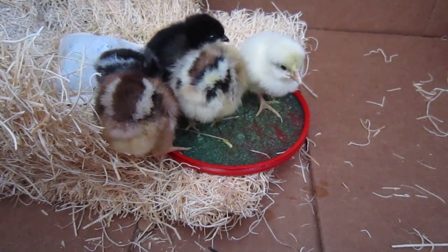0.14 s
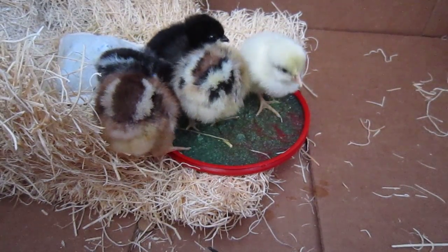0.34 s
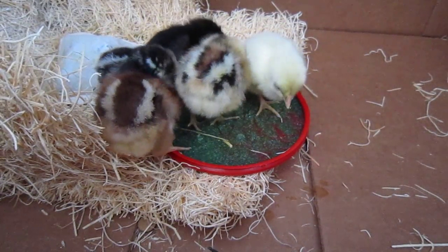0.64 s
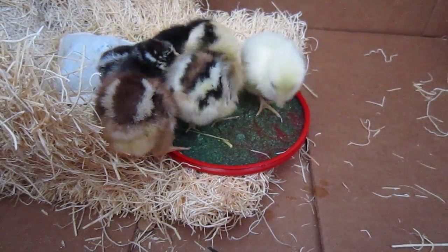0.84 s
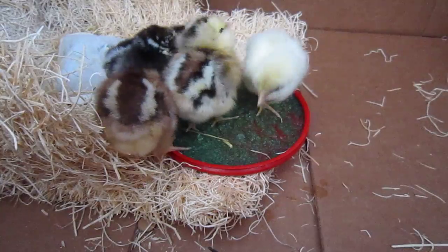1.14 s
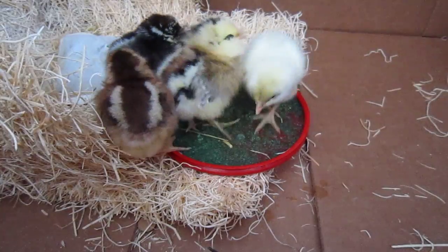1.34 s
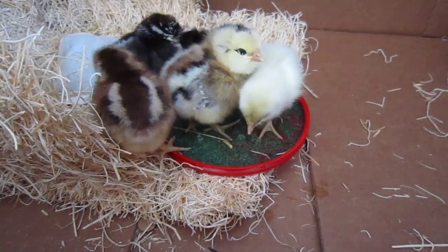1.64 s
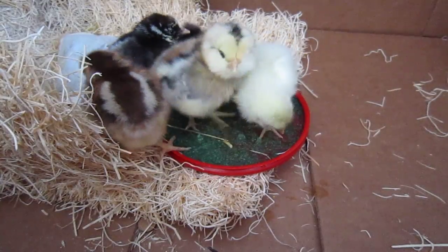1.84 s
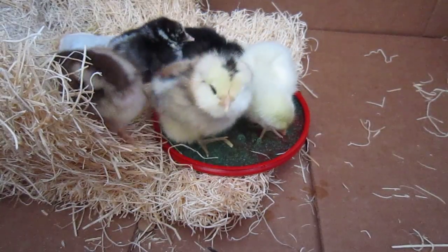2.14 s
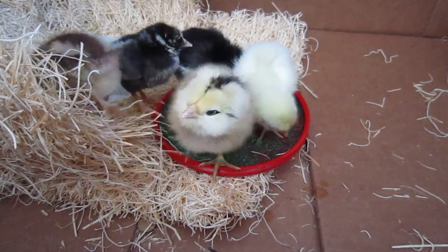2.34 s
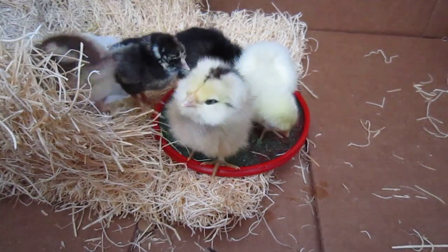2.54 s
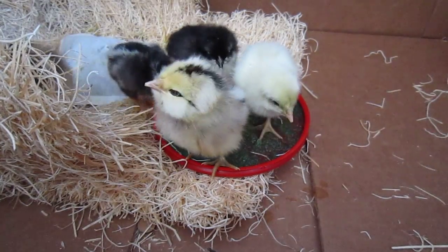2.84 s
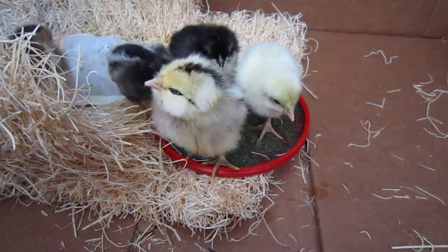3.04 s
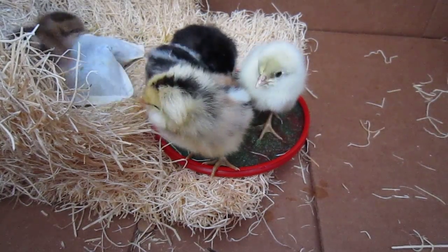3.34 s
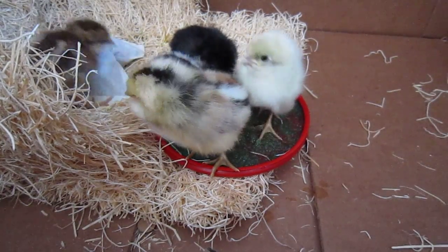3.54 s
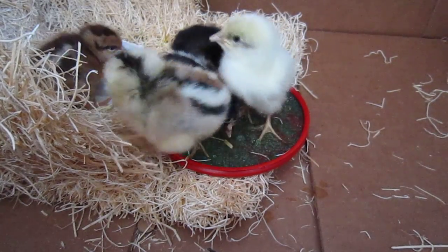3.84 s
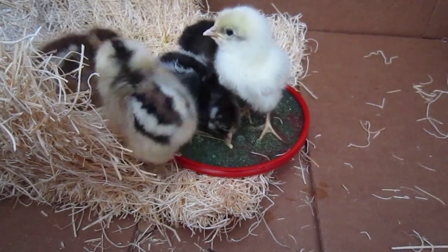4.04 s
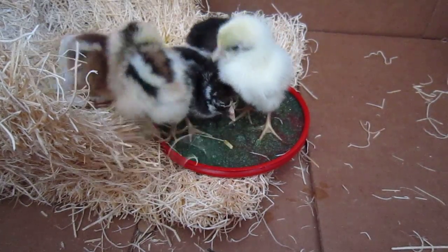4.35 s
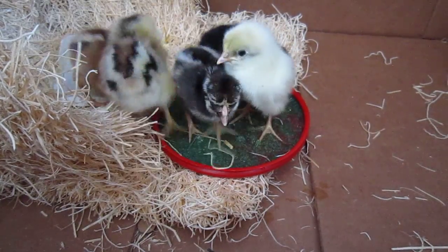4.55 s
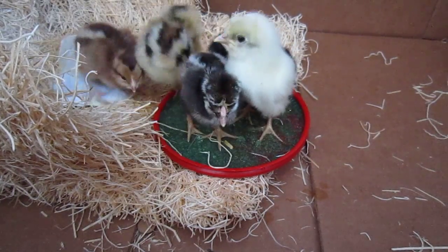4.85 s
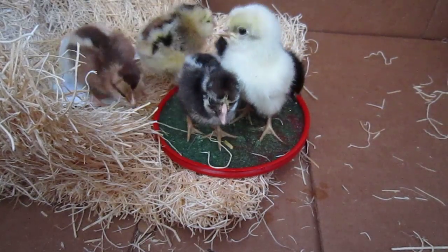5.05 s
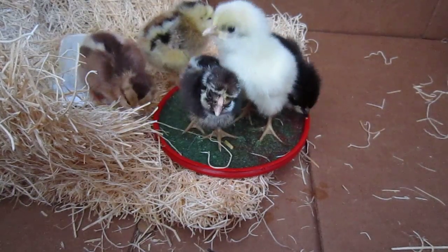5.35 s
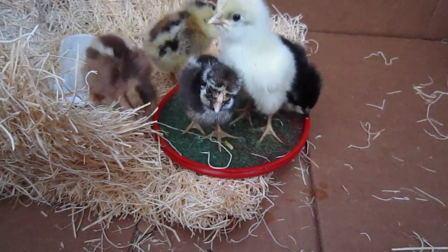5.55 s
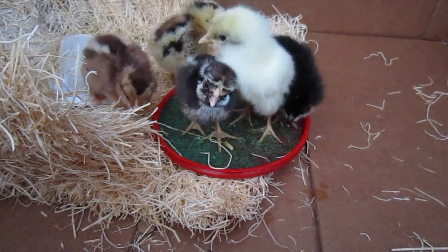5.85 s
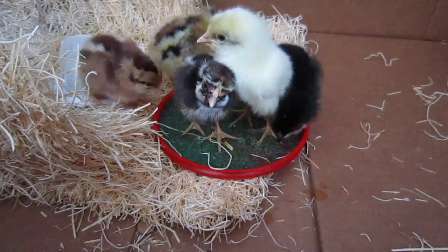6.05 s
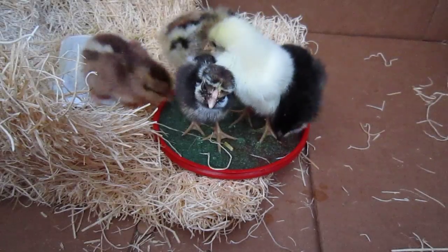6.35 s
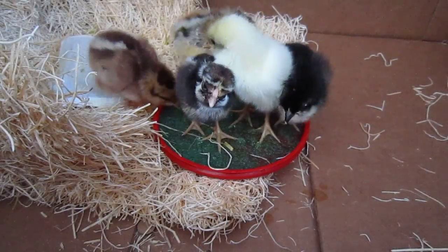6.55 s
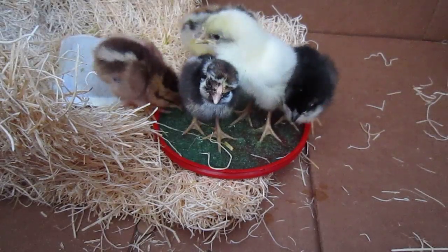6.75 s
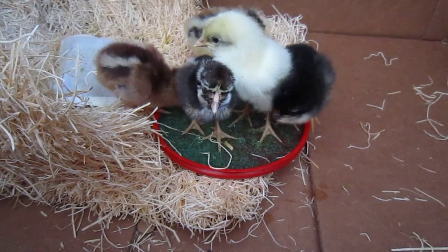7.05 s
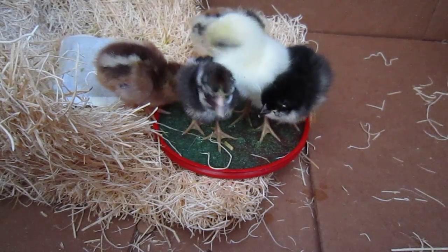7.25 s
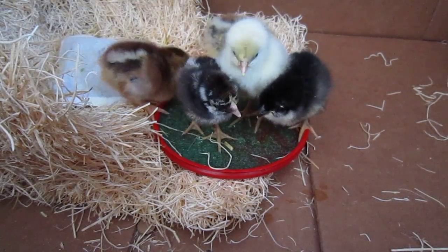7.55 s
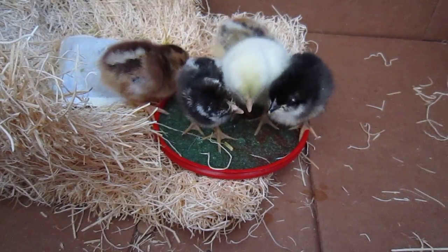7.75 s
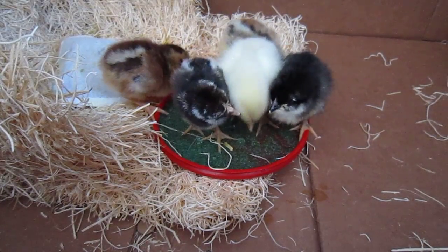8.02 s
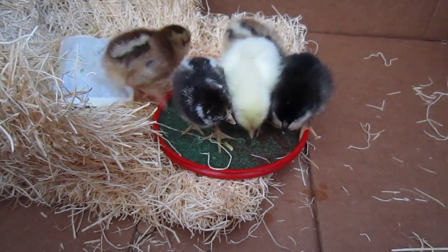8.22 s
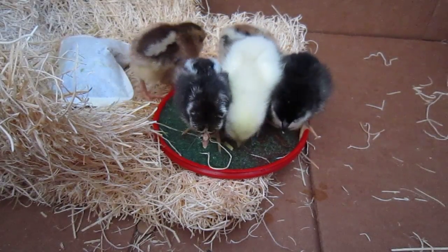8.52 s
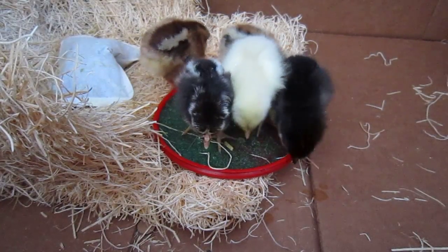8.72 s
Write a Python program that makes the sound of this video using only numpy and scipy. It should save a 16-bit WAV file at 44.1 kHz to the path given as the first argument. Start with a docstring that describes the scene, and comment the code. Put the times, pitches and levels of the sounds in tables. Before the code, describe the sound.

Young chicks peep close by in a cardboard box, with a short, small-room echo. Each peep is a brief, high whistle, most sliding down, some flicking up, occasionally two overlapping. Soft peeps begin at about 0.7 seconds, with a few tiny ticks of pecks and steps. Louder peeps come about three a second from 1.5 to 3 seconds. From 3 to 5 seconds small feet crackle through dry wood shavings and tap lightly on a feed dish, with scattered chirps among them. The peeping is loudest and busiest from about 4.6 to 6.8 seconds, while the rustling dies back to occasional ticks. More widely spaced chirps and a few pecks continue until nearly 9 seconds. Soft room air and a faint, steady appliance hum run throughout, joined by a faint low drone from about 6 to 7.5 seconds.

```python
"""Day-old chicks peep, close by, in a cardboard box lined with wood wool.
Each peep is a gliding whistle with weak overtones; feet snap shavings and tap the feed dish.
Box walls and room add short tails, over air noise, a steady appliance hum and a brief low drone."""
import sys
import numpy as np
from scipy import signal
from scipy.fft import rfft, irfft
from scipy.io import wavfile
from scipy.ndimage import uniform_filter1d

SR = 44100
rng = np.random.default_rng(int(sys.argv[2]) if len(sys.argv) > 2 else 0)


def generate_wav(sig):
    """Save sig (samples, or channels by samples) to the path in sys.argv[1] as 16-bit PCM at SR."""
    pcm = np.round(np.clip(np.atleast_2d(sig).T, -1, 1) * 32767).astype(np.int16)
    wavfile.write(sys.argv[1], SR, pcm)


N = 391608

THIN, THICK = (13500, 5000), (7500, 8500)  # fine and coarse fibre snaps: centre_hz, width_hz


def peeps():
    """Syrinx whistles, sometimes two at once: gliding sines plus overtones, coloured by the box."""
    # falling peeps: start_s, hold_s, fall_s, top_hz, end_hz, level_db, swell_db, fade_db, second_db
    falls = [ (0.655, 0.0053, 0.03, 3830, 2880, -41.5, 7, -10, -18),
             (.775, 0.0022, 0.047, 4290, 3110, -46, 14, -9.5, -22),
             (1.151, 0.018, 0.057, 4300, 2910, -38.5, 3.5, -9.5, -19.5),
             (1.211, 0.0036, 0.053, 4710, 3280, -42, 4, -9.5, -23),
             (1.564, 0.037, 0.057, 4840, 2876, -29.5, 12, -1.5, -20.5),
             (1.578, 0.038, .02, 5080, 4200, -45, 2, 12, -25),
             (1.717, 0, 0.041, 3420, 2990, -45.5, -3, 5, -21),
             (1.822, 0.055, 0.048, 4994, 2740, -26, 8.5, -1, -18),
             (2.137, 0, 0.045, 4150, 3100, -42, 10, -17, -26),
             (2.151, 0.067, 0.052, 5140, 2730, -26.5, 14, -2, -21.5),
             (2.467, 0.069, 0.065, 5183, 2800, -29.5, 19, 0, -14),
             (2.725, 0.0097, 0.047, 3670, 2790, -34, 22, 9, -16.5),
             (2.78, 0.073, 0.045, 4984, 2556, -19.5, 16, 1.5, -23.5),
             (3.177, 0.00063, 0.065, 4430, 3030, -40, 11, 3, -20),
             (3.754, 0.0021, 0.024, 4260, 4070, -41, 19, 1, -36),
             (3.761, 0, .015, 3390, 3210, -40, 1, 11, -28),
             (3.859, 0.00084, 0.038, 4950, 3480, -34.5, 2, 4.5, -20),
             (3.864, 0.0091, 0.022, 5570, 4500, -42, 6, 0, -23),
             (3.988, 0.004, 0.048, 5180, 3530, -29.5, 4, 11.5, -25),
             (3.99, 0.0078, 0.041, 6160, 4900, -44, 8, -4, -13),
             (4.469, 0.008, 0.045, 4830, 3180, -36.5, -9.5, -12, -26),
             (4.583, 0.0069, 0.046, 5400, 4080, -27.5, 11, 17, -21),
             (4.59, .015, 0.03, 6270, 5300, -45, 8, 1, -25),
             (4.708, 0.01, 0.019, 2825, 2670, -45.5, -2, 18, -25),
             (4.727, 0.015, 0.058, 5640, 4220, -19.5, 18, 26, -25),
             (4.753, 0, 0.033, 6640, 5440, -39, -9, -6, -21),
             (4.795, 0.018, 0.026, 2930, 2600, -27.5, 17, 8, -29),
             (4.83, 0.0049, 0.032, 4120, 3050, -52, -2, -15.5, -19),
             (5.056, 0.039, 0.056, 4824, 3100, -23.5, 15.5, 4, -20),
             (5.181, 0.0078, 0.025, 5270, 4400, -44, 11, -2, -38),
             (5.181, 0.0093, 0.022, 4600, 3530, -35, 4, 5, -28),
             (5.231, 0.0065, 0.053, 4360, 3030, -46.5, 0, -7, -22),
             (5.301, 0.0063, 0.016, 6400, 5430, -39, 5, -1, -11),
             (5.302, 0.0081, 0.053, 5300, 3750, -28.5, 9, 7, -26),
             (5.309, 0.049, 0.052, 5110, 2710, -24, 21, -3.5, -19.5),
             (5.471, 0.017, 0.047, 5350, 3670, -24, 9.5, 9, -29),
             (5.465, 0.0073, 0.042, 6540, 4880, -32, 8, -2, -27),
             (5.495, 0.0031, 0.023, 6300, 4320, -36, 12, -17, -33),
             (5.644, 0.054, 0.062, 5170, 2786, -22, 27, 2, -21.5),
             (5.86, 0.01, 0.041, 5410, 3850, -34, 0.5, 7, -23),
             (5.879, 0, 0.025, 5800, 4700, -45.5, -3, 0, -26),
             (6.001, 0.012, 0.064, 5490, 3850, -29, 8.5, 16, -20),
             (6.013, 0.0048, 0.057, 5940, 5000, -43, 7, -7, -36),
             (6.012, 0.0088, .022, 6600, 5960, -49, 2, -2, -20),
             (6.044, .052, 0.05, 4900, 2727, -21.5, 17.5, 0.5, -20.5),
             (6.163, 0.053, 0.029, 5400, 3940, -27.5, 9, 19, -18),
             (6.17, 0.016, 0.032, 6550, 5450, -36, 3, 8, -34),
             (6.173, 0.006, .045, 7250, 5700, -47, 7, -1, -34),
             (6.354, 0.082, 0.048, 4915, 2756, -25, 15, -3, -20.5),
             (6.561, 0.027, 0.019, 3620, 2910, -34.5, 16, -5, -18),
             (6.709, 0.016, 0.05, 4395, 2960, -24.5, 20, 20, -21.5),
             (7.248, 0.024, 0.034, 3825, 2960, -35, 5.5, -5, -18),
             (7.252, 0, 0.06, 6330, 4900, -43, 7, -4, -29),
             (7.253, 0.028, 0.045, 5370, 4020, -32, 6, 21, -18),
             (7.603, 0, 0.022, 3880, 3300, -40.5, -3, -2, -31),
             (7.849, 0.035, 0.031, 3940, 2840, -35, 2.5, 4.5, -22),
             (7.87, 0.017, 0.035, 5550, 4250, -37.5, 1.5, 5, -23),
             (8.029, 0.0061, .014, 6500, 6200, -45, 2, 2, -34),
             (8.041, 0.019, 0.039, 5880, 4620, -27, 9, 14.5, -18.5),
             (8.673, 0.055, 0.03, 4380, 2870, -31, 0, 10, -18)]
    # rising peeps: start_s, hold_s, rise_s, hook_s, from_hz, top_hz, hook_hz,
    # level_db, swell_db, fade_db, second_db
    rises = [ (.902, 0.0082, 0.012, 0.013, 3150, 5200, 5220, -38, 9, 14, -26),
             (1.081, 0.017, 0.012, 0.013, 3460, 5700, 5070, -36, 9.5, 8, -20.5),
             (1.521, 0.0048, 0.023, .007, 3130, 4900, 4890, -37.5, -0.5, 16, -30),
             (1.54, 0, 0.0078, .007, 4700, 5640, 5770, -36.5, 1, 8, -20),
             (1.968, 0.0083, 0.035, 0.0092, 2590, 3704, 3510, -25.5, 6.5, 14, -28),
             (2.233, 0.0014, 0.01, .001, 3080, 3500, 3550, -34, 4, 4, -36),
             (2.677, 0.01, 0.02, 0.018, 2660, 3480, 3630, -37, 6, 17, -24),
             (2.981, 0.014, 0.022, 0.033, 2810, 3780, 3750, -36.5, -2, 19, -24),
             (3.125, 0.0061, 0.011, 0.028, 2910, 5030, 5000, -36.5, 7.5, 18, -19),
             (3.593, 0, 0.036, 0.0062, 2510, 3820, 3750, -24, 14, 14, -28),
             (4.114, 0.00073, 0.019, 0.017, 2390, 3730, 2540, -24, 30, 13.5, -22),
             (5.716, 0.0032, .02, 0.0044, 2420, 3690, 3580, -26.5, 16, -7, -16),
             (6.59, 0.0031, 0.026, 0.0077, 2574, 3770, 3170, -24, 16, 23, -32),
             (6.81, 0, 0.036, 0.0051, 2760, 4280, 3930, -23.5, 0, 13, -32.5),
             (7.318, 0.0072, 0.023, 0.019, 2760, 4210, 4170, -25, -0.5, 15, -23.5),
             (7.534, 0.0034, 0.036, 0.011, 2855, 4220, 4350, -24, 5.5, 26, -31),
             (8.417, 0.00039, 0.017, 0.0058, 2580, 2750, 2800, -36, 10, 3, -32)]
    # box response: pitch_hz, gain_db
    box_colour = [(2400, -7), (2780, -7.5), (2930, -5.5), (3200, -3.5), (3470, -1), (3800, -1), (3980, 1.5),
                  (4250, -5), (4620, -3), (4800, -4.5), (5100, -6), (5500, -8), (6500, -9)]
    edge_s, fall_peak_share, rise_peak_share = 0.0022, 0.33, 0.56
    waver, jitter_rad = 1 + .0035 * walk(290), 1.15 * walk(56)
    patchy_db, quaver = 3 * walk(168), walk(147)
    notes = [(start_s, hold_s, fall_s, 0, top_hz, end_hz, end_hz, fall_peak_share, *rest)
             for start_s, hold_s, fall_s, top_hz, end_hz, *rest in falls]
    notes += [(*row[:7], rise_peak_share, *row[7:]) for row in rises]
    out = np.zeros(N)
    for start_s, hold_s, glide_s, hook_s, from_hz, to_hz, hook_hz, peak_share, *levels in notes:
        level_db, swell_db, fade_db, second_db = levels
        stop_s = start_s + hold_s + glide_s + hook_s
        span = slice(int((start_s - edge_s) * SR), int((stop_s + edge_s) * SR))
        t = np.arange(span.start, span.stop) / SR
        age_s = t - start_s
        pitch_hz, progress = glide(start_s, age_s, hold_s, glide_s, hook_s, from_hz, to_hz, hook_hz)
        dip_surge_db, skip_hz = dips_surges_and_skips(start_s, age_s, progress)
        if to_hz < from_hz:
            pitch_hz += skip_hz
        pitch_hz = uniform_filter1d(pitch_hz, int(0.0053 * SR))
        first_db = dip_surge_db + np.interp(pitch_hz, *np.transpose(box_colour))
        first_db += quaver[span] * np.clip(.14 * (-22 - level_db), 0, 4)  # soft peeps quaver more
        tremble_hz, swing_hz = tremble(t, start_s, stop_s, jitter_rad[span])
        first_db += 0.0147 * tremble_hz
        pitch_hz = pitch_hz * waver[span] + tremble_hz
        phase = 2 * np.pi * (np.cumsum(pitch_hz) / SR + rng.random())
        shape_db = swell_and_fade(age_s, hold_s + peak_share * glide_s, swell_db, fade_db)
        second_db += 0.044 * (shape_db.max() - shape_db)  # overtones swell less
        second_db += patchy_db[span] + 0.031 * swing_hz  # wide tremble sounds harsher
        tone = undb(first_db) * np.sin(phase) + overtones(start_s, pitch_hz, phase, second_db)
        out[span] += gate(t, t[0], t[-1], 2 * edge_s) * undb(level_db + shape_db) * tone
    return out


def glide(start_s, age_s, hold_s, glide_s, hook_s, from_hz, to_hz, hook_hz):
    """Peep pitch: hold, rounded knee, glide, end hook. Also returns glide progress, 0 to 1."""
    # peeps that ease into their top pitch: start_s, below_top_hz
    arches = [(2.151, 320), (5.309, 200), (5.642, 320), (6.161, -330)]
    sag_hz_per_s, low_voice_hz = 780, 4500
    gentle = to_hz < from_hz < low_voice_hz
    knee_s = min(hold_s, .3 * glide_s) if gentle else min(0.7 * hold_s, 0.128 * glide_s)
    turn = np.logaddexp(0, (age_s - hold_s) / (knee_s + 0.00034))
    turn -= turn[0]
    progress = np.clip(turn / np.interp(hold_s + glide_s, age_s, turn), 0, 1)
    hook = np.clip((age_s - hold_s - glide_s) / max(hook_s, 1e-4), 0, 1)
    pitch_hz = from_hz + (to_hz - from_hz) * progress + (hook_hz - to_hz) * hook
    if to_hz < from_hz:  # held top: slide in, then sag
        sung_s = np.maximum(age_s, 0)
        scoop_hz = 0.0522 * min(hold_s / 0.011, 1) * from_hz * np.exp(-sung_s / 0.0021)
        arch_hz = sum(hz for at_s, hz in arches if abs(at_s - start_s) < .004) * np.exp(-sung_s / .02)
        sag_hz = sag_hz_per_s * (age_s - hold_s / 2) * (hold_s > 0)
        pitch_hz -= (1 - progress) * (sag_hz + scoop_hz + arch_hz)
    return pitch_hz, progress


def swell_and_fade(age_s, peak_s, swell_db, fade_db):
    """Peep envelope in dB below its peak."""
    before = np.clip(1 - age_s / peak_s, 0, 1) ** 0.84
    after = np.clip((age_s - peak_s) / (age_s[-1] - peak_s), 0, 1)
    return -swell_db * before - fade_db * after


def dips_surges_and_skips(start_s, age_s, progress):
    """Brief dips where a wall echo cancels the whistle, level surges, and small pitch skips."""
    # dips (negative: surges) and downward skips (negative: lags): at_s, dip_db, half_length_s, skip_hz
    events = [(0.808, 24, 0.0042, 0), (1.207, 15, 0.0044, -6), (1.642, 12, 0.0069, 0),
              (1.889, 12, 0.0033, 442), (2.236, 5, 0.0061, 200), (2.554, -7, 0.0024, 245),
              (2.867, 17, 0.0035, 133), (3.618, 23, 0.0079, 0), (3.872, 8, .003, 0), (4.478, 37, 0.0069, 0),
              (4.76, 20, 0.007, -2), (5.086, 9, 0.0057, -5), (5.135, 10, 0.003, 2), (5.376, -3, 0.0023, 0),
              (5.375, -3, 0.0027, 298), (5.501, 15, 0.0053, 0), (5.72, 3, 0.0025, 443),
              (5.736, 18, 0.0034, 3), (6.096, 10, 0.0026, 402), (6.12, 9, 0.0039, -5),
              (6.394, 21, 0.023, -22), (6.429, 17, 0.0084, -7), (6.449, -8, 0.0029, 350),
              (6.459, 15, 0.0022, 4), (6.595, 9, 0.0013, 6), (6.835, 11, .0025, 0), (8.722, 41, .006, -2),
              (8.701, -7, 0.0064, 6), (5.092, 0, .003, -250), (7.565, 10, .01, 0), (1.867, -6, 0.013, 11),
              (1.891, -5.5, 0.0055, 0), (2.24, -2, 0.0038, -10), (2.513, -19, 0.066, -12),
              (2.812, -9, 0.036, -5), (2.867, -8, 0.0045, -15), (5.101, -5, 0.0062, -4),
              (5.393, -8.5, 0.0041, 4), (5.744, -9.5, 0.0033, 9), (6.127, -6.5, 0.0077, -3),
              (6.466, -8, 0.0049, 0), (6.594, -12, 0.0061, 2), (8.744, -8, 0.015, 2),
              (1.186, -5.5, 0.018, 2), (1.656, -5.5, 0.0028, 2), (1.099, -4, 0.003, 0)]
    gain_db, offset_hz = np.zeros((2, len(age_s)))
    for at_s, dip_db, half_length_s, skip_hz in events:
        event_s = at_s - start_s
        if 0 < event_s < age_s[-1]:
            gain_db -= dip_db * np.clip(1 - np.abs(age_s - event_s) / half_length_s, 0, 1)
            done = np.interp(event_s, age_s, progress)
            sawtooth = np.where(age_s < event_s, progress / done, (progress - 1) / (1.001 - done))
            offset_hz += skip_hz / 2 * sawtooth
    return gain_db, offset_hz


def tremble(t, start_s, stop_s, jitter_rad):
    """The membrane trembles in places: fast pitch offset and its depth."""
    # trembling stretches: from_s, to_s, rate_hz, swing_hz
    flutter = [(0.904, 0.938, 320, 250), (1.086, 1.118, 320.4, 250), (1.577, 1.615, 265, 120),
               (2.158, 2.25, 216, 130), (5.305, 5.369, 222, 207), (5.645, 5.713, 190, 293),
               (6.048, 6.104, 172, 172), (6.41, 6.444, 170, 200)]
    offset_hz, depth_hz = np.zeros((2, len(t)))
    for from_s, to_s, rate_hz, swing_hz in flutter:
        if start_s < from_s + .01 and to_s < stop_s + .002:
            gated_hz = gate(t, from_s, to_s, 0.008) * swing_hz
            depth_hz += gated_hz
            offset_hz += gated_hz * np.sin(2 * np.pi * rate_hz * t + jitter_rad)
    return offset_hz, depth_hz


def overtones(start_s, pitch_hz, phase, second_db):
    """Second and third partials, coloured by the beak; the third dies out below 9.8 kHz."""
    # beak response: freq_hz, gain_db
    beak = [(5000, -7.5), (8000, -1.5), (9000, -13.5), (10000, -8), (11700, -7), (12700, -24), (15000, -34)]
    # peeps with their own third partial level: start_s, re_second_db
    brassy = [(.657, 0), (6.563, 8), (6.708, 4.5), (7.247, 7), (7.847, 0), (8.67, -7)]
    third_db = second_db + next((db for at_s, db in brassy if abs(at_s - start_s) < .01), -7)
    third_db -= 23 * np.maximum(9800 - 3 * pitch_hz, 0) / 1000
    return sum(undb(db + np.interp(k * pitch_hz, *np.transpose(beak))) * np.sin(k * phase)
               for k, db in ((2, second_db), (3, third_db)))


def steps():
    """Steps and pecks snap clusters of fibres and ring the dish modes near the knock's pitch."""
    # steps and pecks: start_s, thin_db, knock_db, thick_db, knock_hz, rise_s
    impacts = [(0.927, -48, -55, -65, 1050, 0.00078), (1.0948, -53, -63, -55, 1390, 0.0006),
               (1.243, -57, -65, -55, 1370, 0.0018), (1.279, -52, -66, -60, 1370, 0.001),
               (1.4948, -48, -63, -69, 1370, 0.0006), (1.9614, -67, -48.5, -66, 800, 0.0035),
               (1.9957, -48, -66, -65, 1530, 0.0006), (2.064, -77, -66, -52, 1490, 0.0019),
               (2.636, -64, -62, -57, 2000, 0.003), (2.9938, -50, -39.5, -37, 2250, 0.0011),
               (3.2765, -64, -41.5, -62, 2250, 0.0019), (3.282, -54, -57, -54, 2300, 0.001),
               (3.291, -62, -41, -55, 2300, 0.0015), (3.299, -62, -47, -62, 2300, 0.00083),
               (3.3145, -52, -40, -52, 1700, 0.0018), (3.362, -57, -43, -40, 1840, 0.0007),
               (3.383, -67, -54, -70, 1880, 0.0055), (3.407, -63, -43, -64, 1780, 0.0016),
               (3.418, -58, -55, -54, 2000, 0.0012), (3.458, -54, -47, -51, 2060, 0.0016),
               (3.4647, -51, -26.5, -38, 1900, 0.002), (3.536, -60, -48, -52, 2200, 0.003),
               (3.542, -44, -32.5, -35.5, 1900, 0.0034), (3.589, -65, -37, -45, 1670, 0.0008),
               (3.6496, -37, -53, -48, 1570, 0.00054), (3.67, -64, -56, -55, 2280, 0.0011),
               (3.707, -58, -50, -58, 2000, 0.0012), (3.9847, -60, -53, -56, 1940, 0.008),
               (4.003, -58, -62, -50, 1900, 0.002), (4.0207, -53, -54, -48, 1640, 0.0049),
               (4.138, -59, -41, -42, 1930, 0.0032), (4.1508, -51, -40, -37, 2170, 0.0012),
               (4.1897, -63, -49, -62, 1620, 0.0033), (4.459, -44, -65, -60, 1410, 0.0006),
               (4.498, -55, -55, -45, 1370, 0.00062), (4.583, -55, -35, -37, 1480, 0.00047),
               (4.6102, -57, -45, -46, 1630, 0.0024), (4.6518, -56, -54, -43, 1560, 0.00051),
               (4.682, -57, -47, -53, 1640, 0.0007), (4.733, -61, -45, -41, 1490, 0.00063),
               (4.853, -54, -58, -45, 1750, 0.00089), (4.865, -56, -40, -54, 1750, 0.003),
               (5.075, -52, -66, -51, 1800, 0.0011), (5.221, -58, -66, -56, 1800, 0.001),
               (5.376, -60, -66, -62, 1800, 0.00091), (6.0696, -45, -58, -60, 1820, 0.00095),
               (6.691, -53, -45, -45, 1780, 0.0013), (6.699, -58, -61, -55, 2200, 0.013),
               (6.7726, -48, -66, -64, 1500, 0.0006), (7.405, -60, -63, -49, 1590, 0.001),
               (7.411, -58, -63, -47.5, 1590, 0.0021), (7.713, -43.5, -56, -52, 1480, 0.0018),
               (8.076, -46, -65, -43, 1200, 0.00065), (8.1881, -71, -46.5, -54, 1900, 0.0029),
               (8.7205, -40, -61, -54, 1560, 0.00062)]
    # feed dish modes: freq_hz, gain_db, t60_s
    dish = [(402, 23.5, 0.016), (630, 15, 0.025), (1010, 5, 0.016), (1300, -1, 0.0075),
            (1750, -5.5, 0.0082), (2050, -0.5, 0.0067), (2350, -2.5, 0.017), (2780, -21, 0.02),
            (4170, 4, 0.011)]
    snap_gain_db, knock_gain_db = 4.0, 10.5
    size = SR // 8
    t = np.arange(size) / SR
    out = np.zeros(N + size)
    for start_s, thin_db, knock_db, thick_db, knock_hz, rise_s in impacts:
        noise = rng.standard_normal((4, size))
        envelope = (t / rise_s * np.exp(1 - t / rise_s)) ** 1.8
        thin, thick, knock = noise[:3] * undb(1.57 * noise[3]) * envelope
        focus_db_per_oct2 = np.clip(-.6 * (knock_db + 18.5), 2, 14)  # heavy blows stir more modes
        ring = 0
        for freq_hz, gain_db, t60_s in dish:
            mode = band(knock, freq_hz, np.log(1000) / np.pi / t60_s)
            ring += undb(gain_db - focus_db_per_oct2 * np.log2(freq_hz / knock_hz) ** 2) * mode
        snap = undb(thin_db) * steep_band(thin, *THIN) + undb(thick_db) * steep_band(thick, *THICK)
        onset = int(start_s * SR)
        out[onset:onset + size] += undb(snap_gain_db) * snap + undb(knock_db + knock_gain_db) * ring
    return out[:N]


def shuffle():
    """Moving chicks crackle the wood wool at random, in three independent bands."""
    # shuffling activity: time_s, crackles_per_s
    activity = [(0, 3.7), (2.9, 32), (3.3, 230), (4.9, 160), (5.1, 11), (8.9, 7.6)]
    hit_chance = np.interp(np.arange(N) / SR, *np.transpose(activity)) / SR
    out = 0
    for band_hz, level_db in ((THIN, -60), (THICK, -58), ((2000, 2200), -55)):
        hits = (rng.random(N) < hit_chance) * undb(level_db + 2.6 * rng.exponential(1, N))
        grains = signal.lfilter([1], [1, -.96], hits) * rng.standard_normal(N)
        out += steep_band(grains, *band_hz)
    return out


def echoes(near):
    """Quick answer of the box walls, then a longer, duller one of the room."""
    box_db, room_db, room_cutoff_hz = -7.5, -14, 6160
    box = np.r_[np.zeros(int(.0015 * SR)), tail(t60_s=0.062)]
    dull_tail = signal.lfilter(*signal.butter(1, room_cutoff_hz, fs=SR), tail(t60_s=0.33))
    room = np.r_[np.zeros(int(.008 * SR)), dull_tail]
    return sum(undb(db) * signal.fftconvolve(near, ir)[:N] for db, ir in ((box_db, box), (room_db, room)))


def background():
    """Room air noise, an appliance's wavering hum lines and a drone that comes and goes."""
    # air noise spectrum: freq_hz, relative_density_db
    air_spectrum = [(20, -9.5), (41, -1.5), (52, -7), (130, -5), (250, -7), (370, -12), (1660, -24.5),
                    (3530, -29), (10200, -36), (16000, -40.5)]
    # appliance hum lines: freq_hz, width_hz, level_db
    hum_lines = [(28.8, 4.1, -57), (120.7, 2.2, -62), (239.3, 1.5, -59), (257.7, 3.5, -55.5)]
    air_db, drone_db, drone_hz = -50.5, -56, 182
    t = np.arange(N) / SR
    bin_hz = np.maximum(np.arange(N // 2 + 1) * SR / N, 1)
    air_hz, density_db = np.transpose(air_spectrum)
    air_gain = undb(np.interp(np.log(bin_hz), np.log(air_hz), density_db)) * (bin_hz > 15)
    air = level(irfft(rfft(rng.standard_normal(N)) * air_gain, N), air_db)
    hum = 0
    for freq_hz, width_hz, level_db in hum_lines:
        skirt = level(band(rng.standard_normal(N), freq_hz, width_hz), 0)
        hum += level(np.sin(2 * np.pi * freq_hz * t) + 0.23 * skirt, level_db)
    drone_gain = undb(drone_db + 2.3 * walk(1.8)) * gate(t, from_s=5.85, to_s=7.5, ramp_s=0.26)
    return air + hum + drone_gain * np.sin(2 * np.pi * drone_hz * t)


def undb(db):
    return 10 ** (np.asarray(db) / 20)


def level(x, rms_db):
    return x * undb(rms_db) / np.sqrt(np.mean(x ** 2))


def gate(t, from_s, to_s, ramp_s):
    return np.clip(np.minimum(t - from_s, to_s - t) / ramp_s, 0, 1)


def band(x, centre_hz, width_hz):
    """Two-pole resonance, unity gain at centre."""
    return signal.lfilter(*signal.iirpeak(centre_hz, centre_hz / width_hz, SR), x)


def steep_band(x, centre_hz, width_hz):
    return band(band(x, centre_hz, width_hz), centre_hz, width_hz)


def walk(rate_hz):
    """Smooth random wander, unit RMS."""
    size = int(SR / rate_hz)
    return level(uniform_filter1d(uniform_filter1d(rng.standard_normal(N), size), size), 0)


def tail(t60_s):
    """Dense wall reflections: decaying noise, unit energy."""
    t = np.arange(int(t60_s * SR)) / SR
    decay = rng.standard_normal(len(t)) * undb(-60 * t / t60_s)
    return decay / np.sqrt(np.sum(decay ** 2))


def scene():
    """Chicks, their echoes and the background; mono."""
    near = peeps() + steps() + shuffle()
    return (near + echoes(near) + background())[None]


def record(dry):
    """Steep low-pass on the top treble."""
    cutoff_hz = 15750
    return signal.sosfilt(signal.ellip(10, .2, 60, cutoff_hz, fs=SR, output="sos"), dry)


dry = scene()
out = record(dry)
generate_wav(out)
```